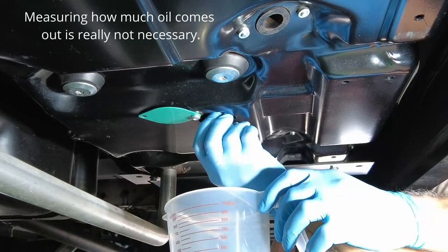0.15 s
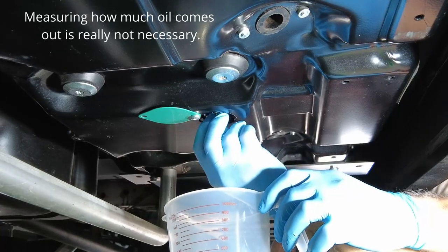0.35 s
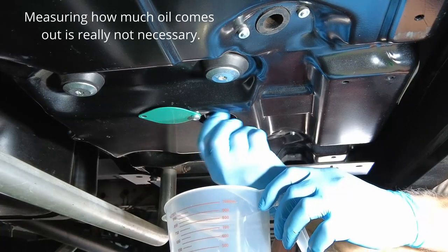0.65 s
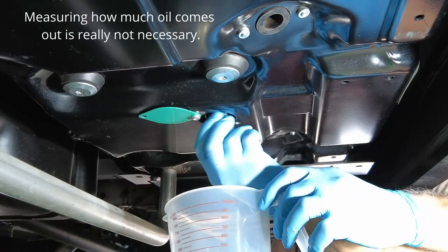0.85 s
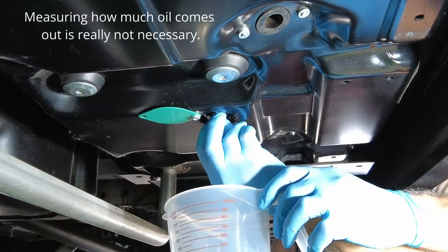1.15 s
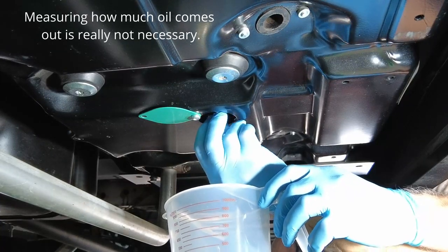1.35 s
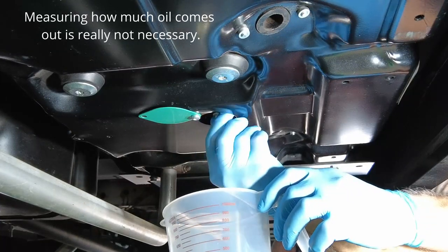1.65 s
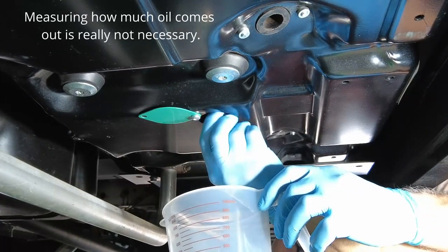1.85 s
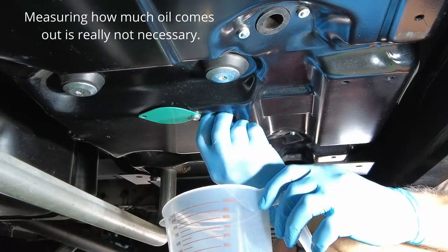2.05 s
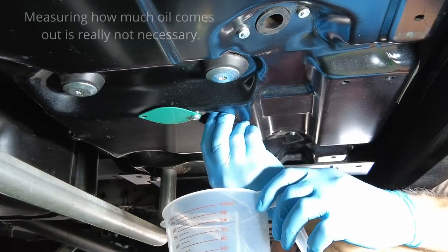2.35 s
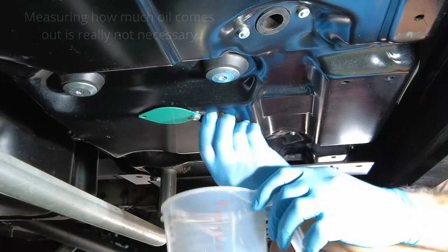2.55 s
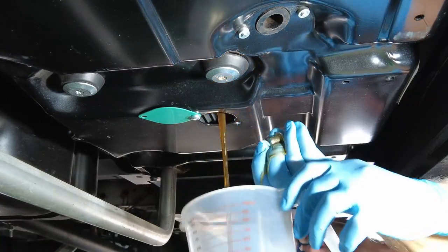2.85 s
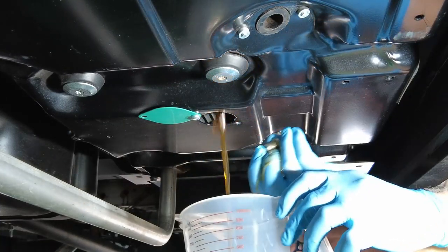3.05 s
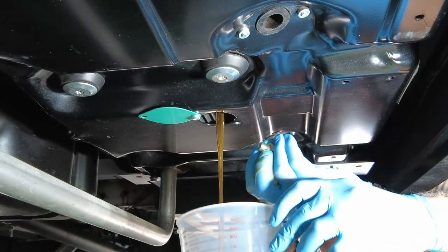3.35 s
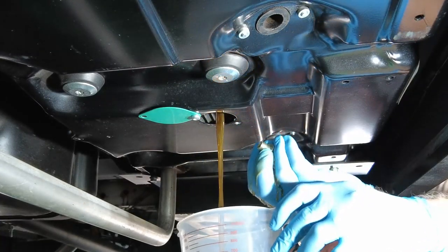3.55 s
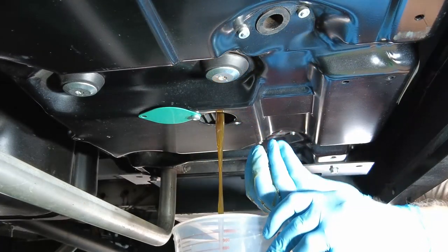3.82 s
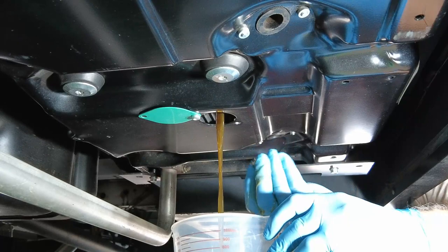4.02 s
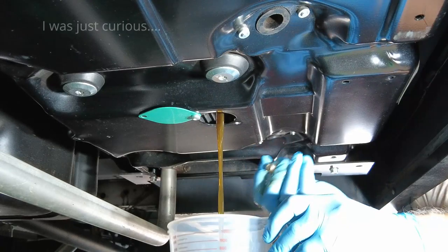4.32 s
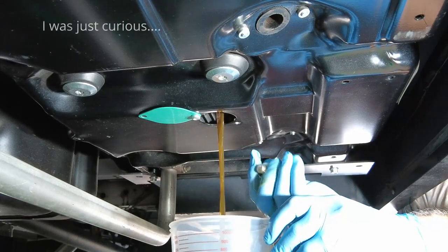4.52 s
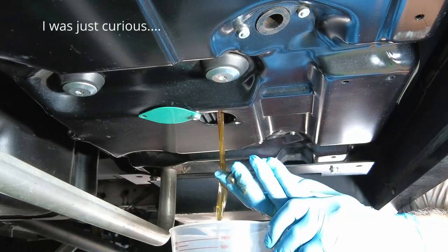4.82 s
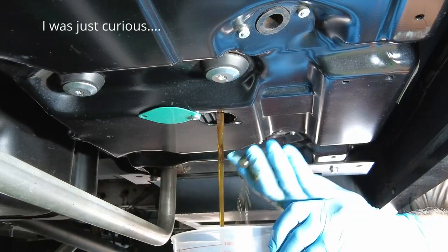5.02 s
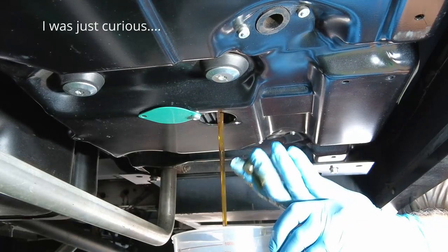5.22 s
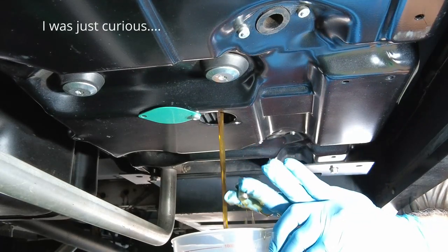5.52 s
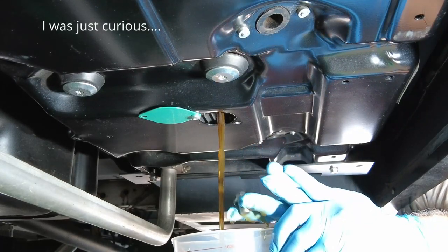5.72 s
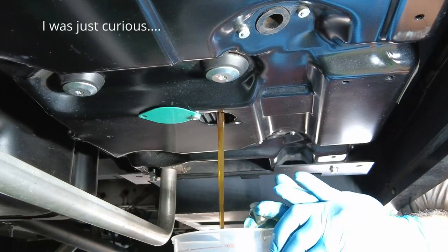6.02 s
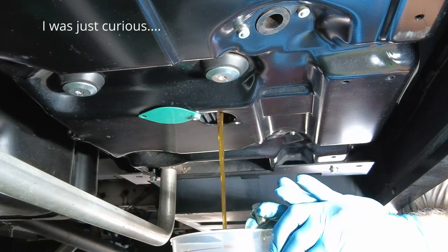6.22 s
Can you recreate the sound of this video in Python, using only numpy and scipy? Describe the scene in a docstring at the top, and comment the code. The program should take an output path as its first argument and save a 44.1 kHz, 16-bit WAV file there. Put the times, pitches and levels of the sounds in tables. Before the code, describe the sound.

Very quiet garage air with faint low rumble, heard close beneath a vehicle. From 0 to 2 seconds rubber gloves make tiny dry rustles and creaks, with a soft bump at 1.3 and a dull tick near 1.9. Between 2.0 and 2.7 small snaps, rubs and muffled thuds of the stand grow busier. At 2.75 to 2.9 the plug lets go: a rumbling surge, rubbing, soft knocks and one short falling glug. A weak knock follows at 3.1. At 3.33 a small hard part lands with a sharp, loud clack, then three rapidly shrinking bounces and a brief rattle echoing off nearby surfaces. Oil then runs almost silently, with faint hiss, low cup hum and, from 4, tiny trickling ticks. Hollow pan taps come faintly at 4.5, a clearer double at 4.8, then 5.13 amid wet glove crackles, and regularly at 5.45, 5.8 and 6.1.

```python
"""A garage, under a vehicle: gloved fingers unscrew a drain plug, and thick oil runs almost silently into a cup.
The oil glugs as the plug lets go (gliding sines); the cup hums and the gloves and oil hiss (shaped noise).
Gloves rustle, crackle and snap (noise bursts); movement near the microphone rumbles and an arm bumps the stand.
Knocks, a small hard part that drops and bounces, and drops tapping a hollow pan ring as sums of dying modes.
Close sounds bounce off the floor, the underbody and the walls, over quiet air."""
import sys
import numpy as np
from scipy import signal
from scipy.fft import rfft, irfft
from scipy.io import wavfile

SR = 44100
rng = np.random.default_rng(int(sys.argv[2]) if len(sys.argv) > 2 else 0)


def attenuation_scalar(level_db):
    """Turn a level in dB into a linear amplitude multiplier (20 dB per decade)."""
    decades = np.asarray(level_db, float) / 20
    return 10 ** decades


def master(y):
    """Save y as 16-bit WAV."""
    cut = np.clip(np.atleast_2d(y).T, -1, 1)
    pcm = np.round(cut * 32767)  # scale
    wavfile.write(sys.argv[1], SR, pcm.astype(np.int16))


N = 281121   # length of the scene in samples

# spectrum of the quiet air: (frequency [Hz], relative level per hertz [dB])
ROOM_TONE = [(59, -23), (100, -5), (163, -3), (275, -9), (317, -7.5), (429, -10), (570, -7), (698, -7.5),
             (926, -7), (1960, -27.5), (3670, -34), (4770, -39.5), (12600, -41), (16400, -73.5),
             (22000, -120)]
ROOM_TONE_DB = -69

# spectrum of the rumble: (frequency [Hz], relative level per hertz [dB])
RUMBLE = [(7.1, -43), (12, 3), (30, 1.5), (76, -7), (166, -15.5), (204, -21.5), (250, -19.5), (320, -40.5),
          (550, -120)]
# movement near the microphone, strongest as the arm pulls back: (time [s], level [dB])
MOVEMENT = [(0, -63), (1.0, -63), (1.8, -64), (2.0, -61), (2.55, -58.5), (2.67, -50), (2.84, -54),
            (2.95, -59), (3.3, -64), (4.0, -64), (4.33, -60), (5.0, -63), (5.6, -61), (6.37, -62)]

# spectrum of gloves and running oil: (frequency [Hz], relative level per hertz [dB])
HISS = [(600, -10.5), (1200, -2), (1600, -3), (1820, 2), (2200, -3), (2800, -2), (3300, -9), (4500, -10),
        (8000, -12.5), (12000, -19), (13500, -34.5)]
# how strongly gloves and oil hiss: (time [s], level [dB])
HISS_LEVEL = [(0, -77), (.3, -79.5), (2.3, -80), (2.55, -76), (2.77, -69), (2.92, -84), (3.15, -80),
              (3.3, -75), (3.9, -79), (4.33, -73.5), (4.7, -75), (5.0, -77), (5.25, -73), (5.6, -77),
              (6.13, -78), (6.27, -72), (6.37, -75)]

# air humming in the cup, stirred by the hand and then by the stream: (time [s], level [dB])
HUM_LEVEL = [(0, -76), (.4, -84), (2.0, -81), (2.55, -77), (2.74, -69), (2.92, -80), (3.3, -72),
             (3.65, -73), (3.8, -90), (4.05, -73), (4.3, -68), (4.5, -72), (4.7, -70), (5.4, -76),
             (5.57, -70), (5.9, -75), (6.3, -68.5)]
CUP_HZ, CUP_WIDTH_HZ = 295, 90   # air resonance of the cup

# echo of the far walls: (frequency [Hz], time to fall 60 dB [s], relative level [dB])
WALLS = [(300, 0.44, -14), (1017, 0.51, -16), (2500, 0.64, -18), (4500, 0.5, -15), (7000, .28, -23),
         (12000, 0.14, -29.5)]
UNDERBODY_T60_S, UNDERBODY_CUT_HZ = 0.13, 4800
NEAR_ECHO_DB, BLOW_ECHO_DB = -14, -15   # echoes of near sounds and of blows

# an arm bumps the stand: (time [s], peak level [dB], pitch [Hz], time to fall 60 dB [s])
BUMPS = [(1.335, -58, 121, 0.1), (1.9, -61, 140, 0.1), (2.179, -47, 176, 0.096), (2.357, -56.5, 162, 0.14),
         (2.654, -47, 160, 0.1), (2.76, -59, 255, 0.091), (5.128, -56.5, 97, 0.14)]

# glove and plug rustles: (time [s], level [dB], resonance [Hz], relative treble [dB], rubbing time [s])
RUSTLES = [(0.0353, -65, 2000, -14, 0.006), (0.154, -70, 2400, -5, 0.005), (0.2273, -64, 3080, -30, 0.006),
           (0.8866, -66, 2330, -6, 0.0035), (0.9794, -71, 1540, -5, 0.015), (1.1393, -65, 3400, -14, 0.012),
           (1.315, -78, 1500, 7, 0.014), (1.341, -63, 3800, -28, 0.008), (1.342, -66, 2600, -28, 0.008),
           (1.5494, -78, 1410, 7, 0.012), (1.6376, -60, 1880, -8, 0.018), (1.699, -73, 2170, 5, 0.007),
           (2.1932, -55, 2480, -5, 0.0033), (2.3512, -64, 1500, -1.5, 0.0046), (2.439, -82, 2340, 11, 0.01),
           (2.4912, -61, 2900, -30, 0.014), (2.532, -80, 2400, 10, 0.012), (2.600, -54, 2650, -35, 0.013),
           (2.602, -55, 1250, -35, 0.03), (2.604, -60, 1600, -35, 0.02), (2.68, -61, 800, -30, 0.015),
           (2.6694, -62, 2500, -8, 0.0042), (2.7555, -50, 1960, -20, 0.025), (2.756, -55, 2560, -35, 0.03),
           (2.765, -55, 1500, -35, 0.015), (2.8494, -68, 4500, -6, 0.005), (2.8948, -48, 1700, -13, 0.008),
           (3.115, -68, 2380, -4, 0.007), (4.0394, -67, 2130, -38, 0.012), (4.3724, -66, 2080, -4, 0.006),
           (4.8703, -65, 2075, -29, 0.0064), (4.927, -66, 2100, -25, 0.004), (4.986, -63, 2670, -25, 0.008),
           (5.0048, -61, 1460, -27, 0.011), (5.0515, -55, 1550, -25, 0.006),
           (5.0782, -62, 2020, -16, 0.008), (5.1092, -49, 2600, -26, 0.0033),
           (5.113, -50, 2030, -30, 0.005), (5.1304, -51, 2700, -14, 0.005), (5.131, -52, 1950, -30, 0.004),
           (5.1642, -65, 4400, -20, 0.004), (5.2107, -53, 2800, -30, 0.0033)]
# what the fingers rub rings: (frequency [Hz], width [Hz], relative level [dB])
PLUG = [(709, 73, 4.5), (1230, 130, 0.5), (1930, 48, -2), (2520, 150, -6), (2770, 140, -7), (4570, 230, -8)]
WASH_DB, TREBLE_RISE_S = -4, .004   # broad wash under the ringing peak of a rustle; soft swell of its treble
CREST_DB = 6   # noise bursts are turned down by this, since their peaks stand above their mean level
# between the listed rustles the gloves creak faintly, at random
FAINT_PER_S, FAINT_DB, FAINT_SPREAD_DB = 7, -76, 3
FAINT_TREBLE_DB, FAINT_TREBLE_SPREAD_DB = -5, 6
FAINT_LOW_HZ, FAINT_HIGH_HZ, FAINT_RUB_S = 1400, 3000, .009

# short dull ticks: (time [s], level [dB])
TICKS = [(0.63, -62), (1.8615, -49), (2.8494, -45), (2.9375, -56), (4.048, -57), (4.228, -60), (4.428, -60),
         (4.494, -58), (4.638, -60), (5.6495, -49), (5.7506, -46), (5.8905, -48), (6.003, -60)]
TICK_LOW_HZ, TICK_HIGH_HZ, TICK_T60_S = 500, 3100, .04
# faint ticks where the stream lands
TRICKLE_FROM_S, TRICKLE_PER_S, TRICKLE_DB, TRICKLE_SPREAD_DB = 4.0, 16, -66, 3
# thin snaps of the oily glove: (time [s], level [dB], pitch [Hz])
SNAPS = [(0.073, -63, 3500), (2.028, -47, 850), (2.029, -62, 5000), (2.029, -63, 8500), (2.193, -54, 9500),
         (2.351, -59, 9500), (2.5575, -52, 3000), (2.668, -56, 10500), (2.774, -54, 10500),
         (2.877, -49, 6300), (2.881, -57, 9500), (2.899, -52, 10500), (3.563, -61, 7200),
         (3.8867, -47, 5400), (4.619, -47, 1000), (4.773, -60, 5000), (4.986, -60, 4400),
         (5.033, -57, 8300), (5.082, -58, 3500), (5.085, -62, 8500), (5.110, -54, 6500),
         (5.1304, -47, 4700), (5.145, -53, 8600), (5.164, -58, 10000), (5.183, -59, 10300),
         (5.208, -61, 9000), (5.234, -55, 7200), (5.253, -56, 7500), (5.255, -62, 4300), (5.295, -64, 4300),
         (5.3405, -50, 2150), (5.368, -57, 5000)]
SNAP_WIDTH, SNAP_T60_S = 1.25, .026   # band edges as a ratio around the pitch

# air pockets in the oil; glugs sink in pitch, a closing bubble rises:
# (time [s], peak level [dB], start pitch [Hz], end pitch [Hz], glide [s], time to fall 60 dB [s])
BUBBLES = [(2.874, -48, 615, 590, 0.0044, .04), (2.890, -27.5, 640, 550, 0.0092, .035),
           (2.916, -47, 570, 500, .010, .07), (5.190, -60, 1100, 2100, .014, .02),
           (5.206, -54, 2300, 2900, .008, .05), (5.052, -58, 1900, 1300, .008, .04),
           (5.080, -60, 1700, 2050, .008, .04), (5.112, -53, 1700, 2050, .005, .035),
           (5.160, -62, 1200, 1500, .01, .04)]

# drops on the pan: (time [s], level [dB], pitch ratio, and the changes of the
# off-centre modes [dB], upper modes [dB], bass modes [dB], short modes [dB])
DRIPS = [(4.467, -49, 1.06, -24, -14, -14, 8), (4.485, -46, 1.06, -34, -3, -14, -14),
         (4.7775, -34, 1.0, 8, -7, -12, 0), (4.791, -33, 1.03, -5, -9, -12, -3),
         (4.999, -53, 1, -16, -12, -5, 0), (5.052, -51, 1.01, -1, 0, -5, 0),
         (5.135, -34, 1.0, -31, -6, 1, -5), (5.454, -31.5, 0.995, -16, -1, 0, 0),
         (5.776, -30.5, 0.99, -15, 2.5, 0, 0), (6.101, -30.5, 0.985, -16.5, 2, 0, 0)]
# modes of the pan: (frequency [Hz], relative level [dB], time to fall 60 dB [s])
PAN = [(247.8, -10, 0.3), (305, -14, 0.15), (382.6, -11, 0.2), (445, -15, 0.18), (556, 5, 0.048),
       (641.8, 7, 0.14), (618, -7, 0.2), (897, -5, 0.02), (760, -10, 0.05), (1042, -4, 0.048),
       (1215, -4, 0.1), (1252, 1.5, 0.11), (1310, -5, 0.13), (1450, -12, 0.04), (1810, -23, 0.15),
       (2450, -6.5, 0.03), (2900, -12.5, 0.032)]
# extra modes of a tap near the edge: (frequency [Hz], relative level [dB], time to fall 60 dB [s])
OFF_CENTRE = [(540, 7, 0.1), (834, 4, 0.045), (1460, -4, 0.09)]
PUSH_DB, PUSH_S = -17, .0012   # the drop dents the pan: a low one-sided push

# soft knocks on the hard body: (time [s], level [dB], low-mode change [dB], rise [s], ring time ratio)
KNOCKS = [(2.027, -56.5, 16, 0.0015, 0.44), (2.7545, -44.5, 10, 0.003, 1.1), (2.893, -39, 5, 0.0039, 0.48),
          (3.113, -51, 14, 0.0029, 0.41)]
# the part lands: (time [s], level [dB], low-mode change [dB], rise [s], ring time ratio, crack [dB])
LANDING = (3.3319, -7.3, -3.5, 0.0011, 0.8, -12)
# modes of the hard body: (frequency [Hz], relative level [dB])
BODY = [(375, -11), (425, -16), (480, -28), (530, -9), (568, 0), (620, -9), (725, -15.5), (880, -17),
        (1050, -28), (1250, -20.5), (1450, -13), (1600, -35), (1680, -4), (1760, -11), (1935, -11),
        (2070, -7), (2320, -4), (2500, -4), (2700, -2), (2790, -9), (2900, -6.5), (3160, -7), (3400, -12),
        (3670, -4), (3900, -11), (4320, -11), (4660, -11), (5040, -15), (5600, -11), (6000, -18),
        (7830, -19)]
BODY_CYCLES, BODY_LONGEST_S = 36, .06   # limits on each mode's ring, before the ring time ratio
BLOW_SPREAD_DB, BODY_CUT_HZ = 4, 300   # each lesser blow shares its strength among the modes anew
SOFT_CRACK_DB = -22
# the far end of the part slaps down just after, missing the low modes
REBOUND_S, REBOUND_DB, REBOUND_LOW_DB = .004, -15, -22
# three bounces follow, each hop shorter by the ratio
FIRST_HOP_S, HOP_RATIO = .048, .665
FIRST_BOUNCE_DB, BOUNCE_LOSS_DB, BOUNCE_THINS_DB = -21, 8, 5.5
BOUNCE_RING, BOUNCE_CRACK_DB = 1.1, -15
# a dense rattle fills the gaps between the modes
RATTLE_LOW_HZ, RATTLE_HIGH_HZ, RATTLE_DB, RATTLE_T60_S = 1300, 4800, -23.5, .115
WOBBLE_PER_S = 90   # loose or wet bodies waver in strength this often


def rms_one(x):
    """Scale to rms 1."""
    return x / np.sqrt(np.mean(x ** 2) + 1e-20)


def at_hz(points, hz):
    """Read a table on a log-frequency axis."""
    points = np.array(points)
    return np.interp(np.log(hz), np.log(points[:, 0]), points[:, 1])


def at_every_sample(curve):
    """Read a (time, level) curve at every sample."""
    return np.interp(np.arange(N) / SR, *np.transpose(curve))


def drift(rate):
    """Random wander: knots of spread 1, this many a second, joined by straight lines."""
    knots = rng.standard_normal(int(rate * N / SR) + 3)
    return np.interp(np.arange(N) * rate / SR, np.arange(len(knots)), knots)


def coloured(spectrum):
    """Noise with the given spectrum, rms 1."""
    hz = np.maximum(np.arange(N // 2 + 1) * SR / N, 1)
    white = rfft(rng.standard_normal(N))
    return rms_one(irfft(white * attenuation_scalar(at_hz(spectrum, hz)), N))


def bandpass(x, low_hz, high_hz, order):
    """Keep what lies between two frequencies."""
    return signal.sosfilt(signal.butter(order, [low_hz, high_hz], "band", fs=SR, output="sos"), x)


def highpass(x, cut_hz):
    """Take away the bass below a frequency."""
    return signal.sosfilt(signal.butter(4, cut_hz, "high", fs=SR, output="sos"), x)


def add(out, s, sound):
    """Mix a sound in at a time."""
    i = int(round(s * SR))
    out[i:i + len(sound)] += sound[:len(out) - i]


def burst(low_hz, high_hz, t60):
    """Band noise that starts at once and is gone in hundredths of a second."""
    t = np.arange(SR // 10) / SR
    noise = rms_one(bandpass(rng.standard_normal(len(t)), low_hz, high_hz, 4))
    return attenuation_scalar(-CREST_DB - 60 * t / t60) * noise


def strike(modes, rise_s, crack_db, crack_t60, wobble_db, cut_hz):
    """Modes swell over the contact time, waver and die, scaled to peak 1, with a crack of noise."""
    t = np.arange(SR // 2) / SR
    rings = np.zeros(len(t))
    for k, (hz, db, t60) in enumerate(modes):
        # the wavering sets in from nothing over the first knots
        waver = rng.standard_normal(80) * np.minimum(np.arange(80) / 2, 1)
        wobble = wobble_db * np.interp(t * WOBBLE_PER_S, np.arange(80), waver)
        strength = attenuation_scalar(db - 60 * t / max(t60, .005) + wobble)
        rings += strength * np.sin(2 * np.pi * hz * t + k * k)   # k * k scatters the phases
    rings = rings * (1 - np.exp(-(t / rise_s) ** 2))
    rings = highpass(rings, cut_hz)   # small bodies radiate no bass
    # countless high modes, gone quickly
    crack = bandpass(rng.standard_normal(len(t)), 2400, 8800, 3)
    crack = crack * np.minimum(t / .002, 1) * attenuation_scalar(crack_db - 60 * t / crack_t60)
    return rings / np.abs(rings).max() + crack


def room_tone():
    """Quiet air of the garage: steady noise whose level wanders a little."""
    return attenuation_scalar(ROOM_TONE_DB + 1.1 * drift(2.9)) * coloured(ROOM_TONE)


def movement_rumble():
    """Low noise that follows movement near the microphone."""
    return attenuation_scalar(at_every_sample(MOVEMENT) + 0.55 * drift(24)) * coloured(RUMBLE)


def glove_and_oil_hiss():
    """Soft noise of gloves and running oil, with an unsteady level."""
    return attenuation_scalar(at_every_sample(HISS_LEVEL) + 2.6 * drift(40)) * coloured(HISS)


def cup_hum():
    """Air in the cup resonates: noise in a narrow band around the cup's pitch."""
    half = CUP_WIDTH_HZ / 2
    air = rms_one(bandpass(rng.standard_normal(N), CUP_HZ - half, CUP_HZ + half, 2))
    return attenuation_scalar(at_every_sample(HUM_LEVEL) + 2.5 * drift(9)) * air


def garage(x):
    """Quick dense reflections between floor and underbody, with a longer tail from the walls."""
    t, tail = np.arange(int(.7 * SR)) / SR, 0
    edges = 150 * 2 ** np.arange(0, 7, .5)   # half-octave bands
    hz, t60, walls_db = np.transpose(WALLS)
    for low, high in zip(edges, edges[1:]):
        band = bandpass(rng.standard_normal(len(t)), low, high, 2)
        walls = attenuation_scalar(at_hz(np.c_[hz, walls_db], low) - 60 * t / at_hz(np.c_[hz, t60], low))
        close = attenuation_scalar(-60 * t / UNDERBODY_T60_S) / np.hypot(1, low / UNDERBODY_CUT_HZ)
        tail = tail + band * np.hypot(close, walls)
    tail = tail * np.clip((t - .002) / .004, 0, 1)   # the first surfaces answer after a few ms
    return signal.fftconvolve(x, tail / np.sqrt(np.sum(tail ** 2)))[:N]


def bumps():
    """Dull, soft thuds carried through the stand: low sines that swell and die."""
    out, t = np.zeros(N), np.arange(SR // 3) / SR
    for s, db, hz, t60 in BUMPS:
        shape = np.minimum(t / 0.0069, 1) * attenuation_scalar(db - 60 * t / t60)
        add(out, s, shape * np.sin(2 * np.pi * hz * t))
    return out


def faint_rustles(count=60):
    """Rows like those of RUSTLES, at random gaps, pitches and strengths."""
    s = np.cumsum(rng.exponential(1 / FAINT_PER_S, count))
    db = FAINT_DB + FAINT_SPREAD_DB * rng.standard_normal(count)
    hz = FAINT_LOW_HZ * (FAINT_HIGH_HZ / FAINT_LOW_HZ) ** rng.random(count)
    treble_db = FAINT_TREBLE_DB + FAINT_TREBLE_SPREAD_DB * rng.standard_normal(count)
    rows = np.c_[s, db, hz, treble_db, np.full(count, FAINT_RUB_S)]
    return rows[s < N / SR - .01]


def rustles():
    """Rubber slips with a snap, then crackles into one ringing peak over a broad wash and a treble."""
    out, t = np.zeros(N), np.arange(int(.3 * SR)) / SR
    for s, db, hz, treble_db, rub_s in [*RUSTLES, *faint_rustles()]:
        # uneven grains make the crackle; all three bands share the unevenness
        grains = rng.standard_normal((3, len(t))) * attenuation_scalar(5.0 * rng.standard_normal(len(t)))
        peak = rms_one(bandpass(grains[0], hz / 1.035, hz * 1.035, 3))
        wash = rms_one(bandpass(grains[1], hz / 6.4, hz * 1.81, 3))
        treble = rms_one(bandpass(grains[2], 6000, 13000, 3))
        t60 = 0.035 + 1.7 * rub_s   # long rubs also fade slowly
        rise = np.minimum(t / (0.00024 + 0.089 * rub_s), 1)
        shape = rise * attenuation_scalar(-60 * np.maximum(t - rub_s, 0) / t60)
        snap = 1 + 1.3 * np.exp(-t / 0.0011)
        wash = snap * shape * wash
        plug = sum(attenuation_scalar(level) * signal.lfilter(*signal.iirpeak(mode_hz, mode_hz / width, SR), wash)
                   for mode_hz, width, level in PLUG)
        wash = wash + attenuation_scalar(9) * plug
        treble = np.minimum(t / TREBLE_RISE_S, 1) * shape * attenuation_scalar(treble_db) * treble
        add(out, s, attenuation_scalar(db - CREST_DB) * (shape * peak + attenuation_scalar(WASH_DB) * wash + treble))
    return out


def trickle(count=60):
    """Rows like those of TICKS, at random gaps and strengths."""
    s = TRICKLE_FROM_S + np.cumsum(rng.exponential(1 / TRICKLE_PER_S, count))
    db = TRICKLE_DB + TRICKLE_SPREAD_DB * rng.standard_normal(count)
    return np.c_[s, db][s < N / SR - .01]


def ticks_and_snaps():
    """Bursts of noise: dull ticks in the middle band, thin snaps around their own pitch."""
    out = np.zeros(N)
    for s, db in [*TICKS, *trickle()]:
        add(out, s, attenuation_scalar(db) * burst(TICK_LOW_HZ, TICK_HIGH_HZ, TICK_T60_S))
    for s, db, hz in SNAPS:
        add(out, s, attenuation_scalar(db) * burst(hz / SNAP_WIDTH, hz * SNAP_WIDTH, SNAP_T60_S))
    return out


def drips():
    """Drops tap the pan; where they land shifts its pitch and the share of its modes."""
    out, t = np.zeros(N), np.arange(SR // 50) / SR
    push = t / PUSH_S * np.exp(1 - t / PUSH_S)
    for s, db, ratio, off_db, upper_db, bass_db, short_db in DRIPS:
        modes = []
        for hz, level, t60 in PAN:
            level = level + upper_db * (hz > 900) + bass_db * (hz < 500) + short_db * (t60 < .06)
            modes.append((hz * ratio, level, t60))
        modes += [(hz, level + off_db, t60) for hz, level, t60 in OFF_CENTRE]
        tap = strike(modes, rise_s=0.00084, crack_db=-26, crack_t60=0.063, wobble_db=1.6, cut_hz=200)
        add(out, s, attenuation_scalar(db) * tap)
        add(out, s - PUSH_S, -attenuation_scalar(db + bass_db + PUSH_DB) * push)
    return out


def bubbles():
    """A sine that glides while the air pocket changes size, swelling, then ringing out."""
    out, t = np.zeros(N), np.arange(SR // 5) / SR
    for s, db, from_hz, to_hz, glide_s, t60 in BUBBLES:
        glide = np.minimum(t / glide_s, 1)
        hz = from_hz * (to_hz / from_hz) ** glide
        swell = np.sin(np.pi / 2 * glide) ** 1.3
        fade = attenuation_scalar(db - 60 * np.maximum(t - glide_s, 0) / t60)
        add(out, s, swell * fade * np.sin(2 * np.pi * np.cumsum(hz) / SR))
    return out


def bounces():
    """The dropped part hops three times, each hop shorter, weaker and thinner in the low modes."""
    s, _, low_db, rise_s, *_ = LANDING
    hops = s + FIRST_HOP_S * np.cumsum(HOP_RATIO ** np.arange(3))
    return [(at, FIRST_BOUNCE_DB - BOUNCE_LOSS_DB * k, low_db - BOUNCE_THINS_DB * (k + 1),
             rise_s, BOUNCE_RING, BOUNCE_CRACK_DB) for k, at in enumerate(hops)]


def rattle():
    """Grainy noise that swells in a few ms and outlasts the modes."""
    t = np.arange(SR // 2) / SR
    grains = rng.standard_normal(len(t)) * attenuation_scalar(3.5 * rng.standard_normal(len(t)))
    noise = rms_one(bandpass(grains, RATTLE_LOW_HZ, RATTLE_HIGH_HZ, 3))
    return noise * np.minimum(t / .003, 1) * attenuation_scalar(-60 * t / RATTLE_T60_S)


def knocks_and_dropped_part():
    """Each blow rings the same hard body, with its own share of low modes and its own ring time."""
    out = np.zeros(N)
    rebound = (LANDING[0] + REBOUND_S, REBOUND_DB, REBOUND_LOW_DB, *LANDING[3:])
    soft = [(*row, SOFT_CRACK_DB) for row in KNOCKS]
    for row in [*soft, LANDING, rebound, *bounces()]:
        s, db, low_db, rise_s, ring, crack_db = row
        lesser = row not in (LANDING, rebound)
        shares_db = rng.normal(0, BLOW_SPREAD_DB, len(BODY)) * lesser
        modes = []
        for (hz, level), share_db in zip(BODY, shares_db):
            t60 = ring * min(BODY_CYCLES / hz, BODY_LONGEST_S)
            modes.append((hz, level + share_db + low_db * (hz < 900), t60))
        blow = strike(modes, rise_s, crack_db, crack_t60=0.037, wobble_db=1.5, cut_hz=290)
        # the rattle grows with the crack
        add(out, s, attenuation_scalar(db) * (blow + attenuation_scalar(RATTLE_DB + crack_db - LANDING[-1]) * rattle()))
    return highpass(out, BODY_CUT_HZ)


def scene():
    """Close events with their reflections over the steady air."""
    air = room_tone() + movement_rumble() + glove_and_oil_hiss() + cup_hum()
    near = rustles() + ticks_and_snaps() + drips() + bubbles()
    blows = knocks_and_dropped_part()
    echoes = garage(attenuation_scalar(NEAR_ECHO_DB) * near + attenuation_scalar(BLOW_ECHO_DB) * blows)
    return (air + bumps() + echoes + near + blows)[None]   # one channel


def roll_off(x):
    """The treble ends steeply here."""
    return signal.sosfilt(signal.butter(12, 16060, fs=SR, output="sos"), x)


def record(dry):
    """Turn the finished mix into the sound that is written."""
    return roll_off(dry)


dry = scene()
out = record(dry)
master(out)
```